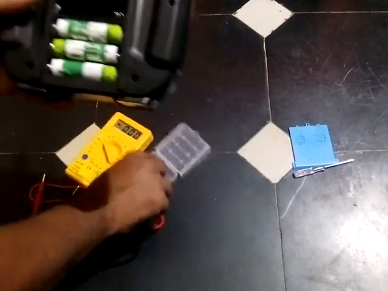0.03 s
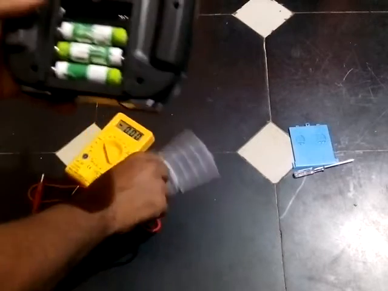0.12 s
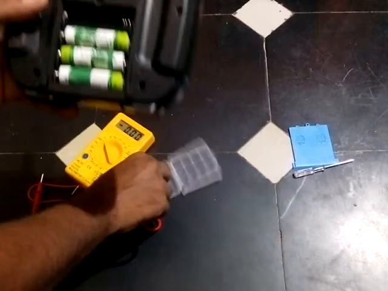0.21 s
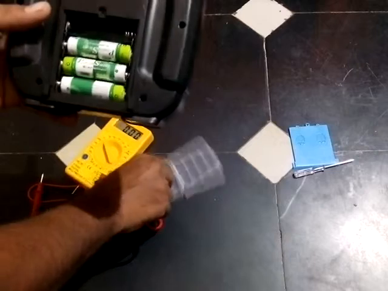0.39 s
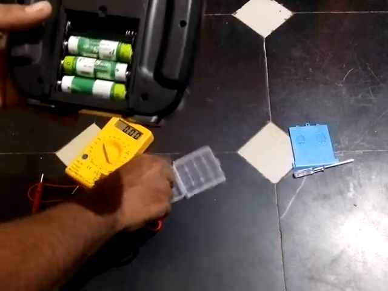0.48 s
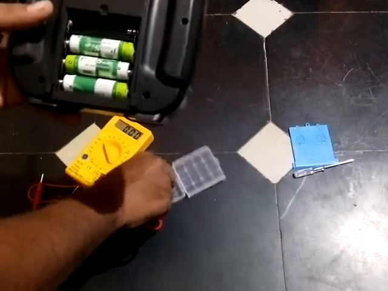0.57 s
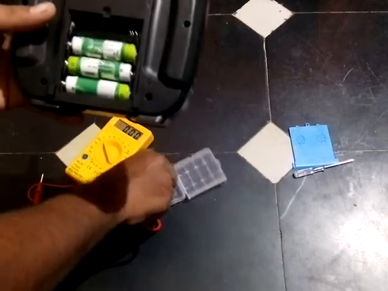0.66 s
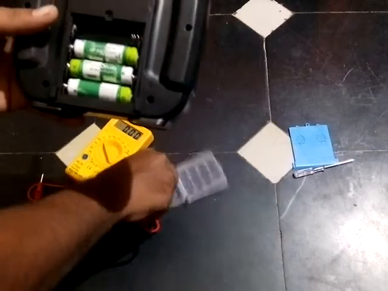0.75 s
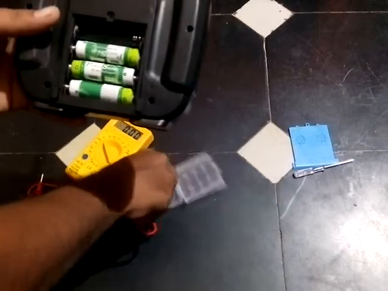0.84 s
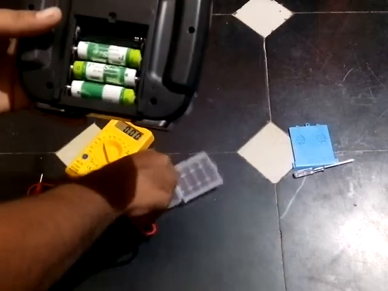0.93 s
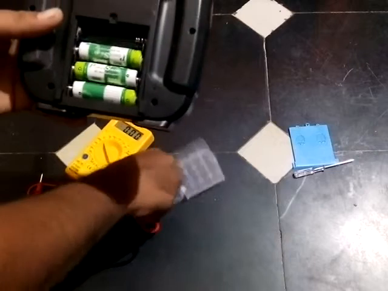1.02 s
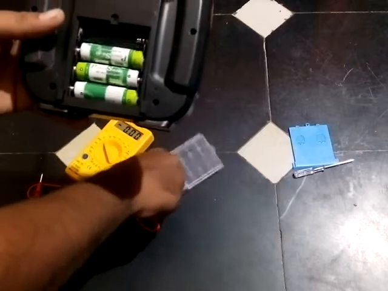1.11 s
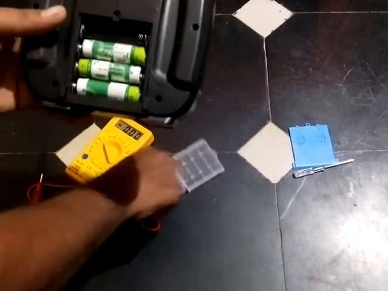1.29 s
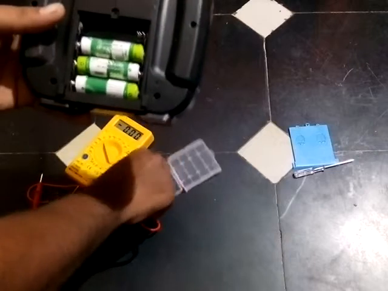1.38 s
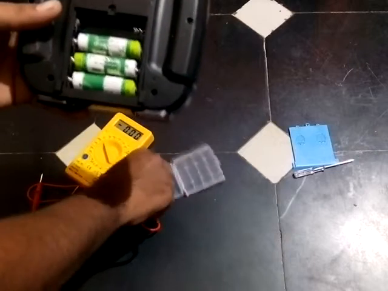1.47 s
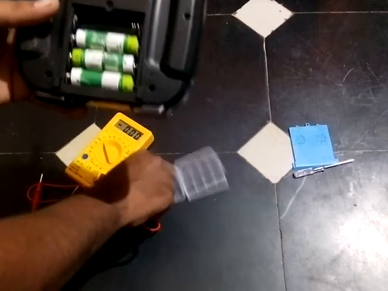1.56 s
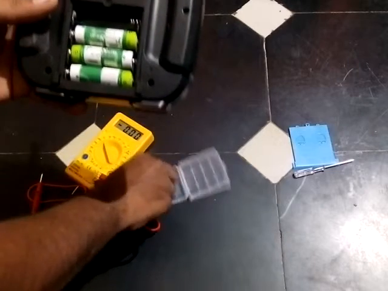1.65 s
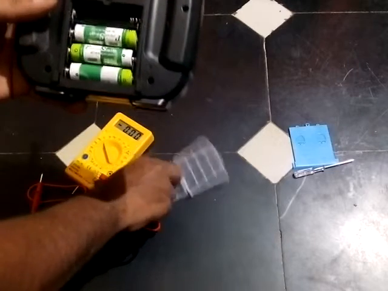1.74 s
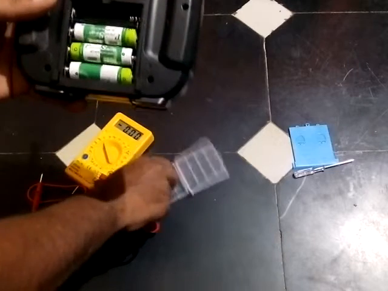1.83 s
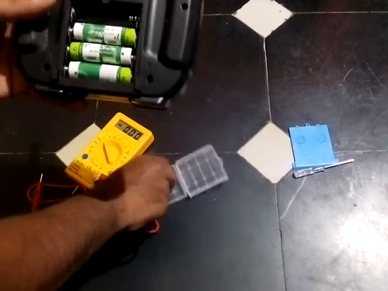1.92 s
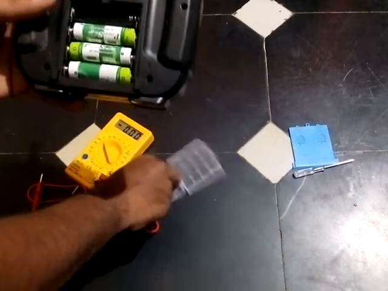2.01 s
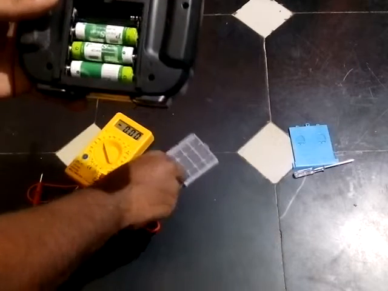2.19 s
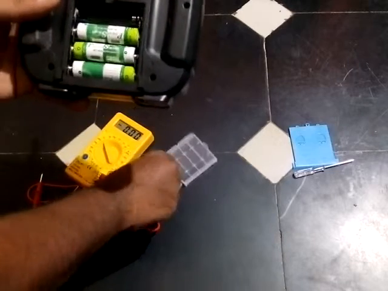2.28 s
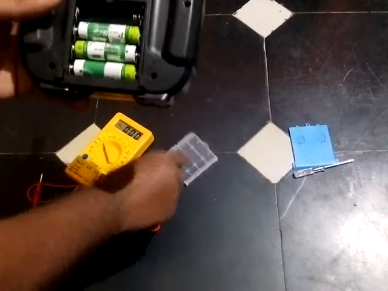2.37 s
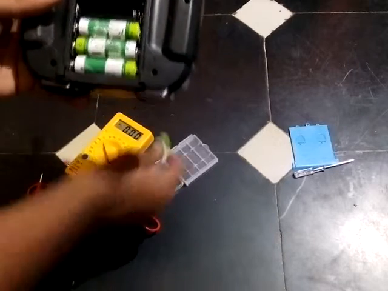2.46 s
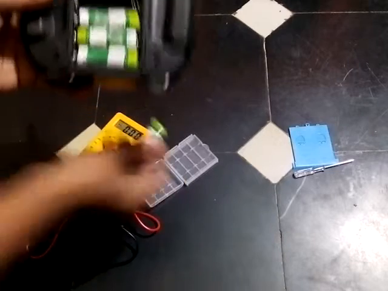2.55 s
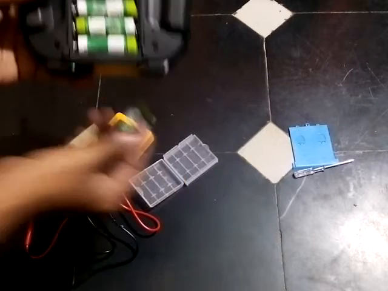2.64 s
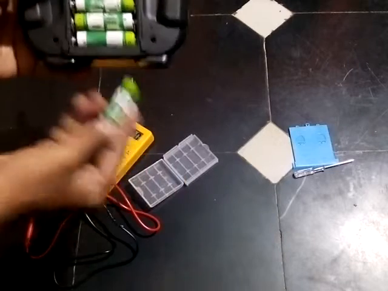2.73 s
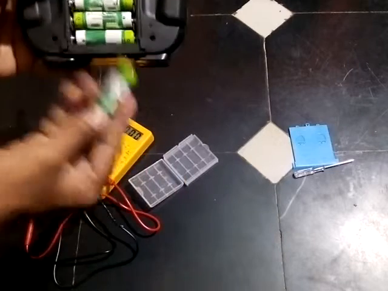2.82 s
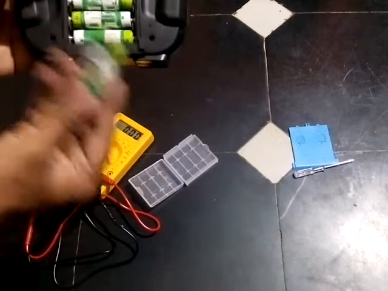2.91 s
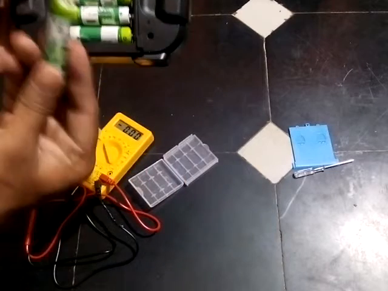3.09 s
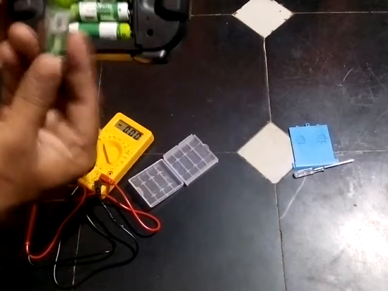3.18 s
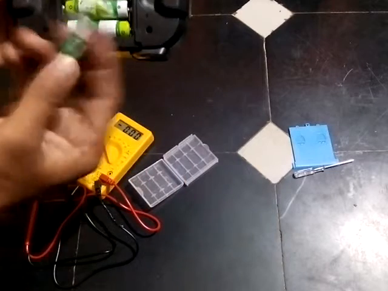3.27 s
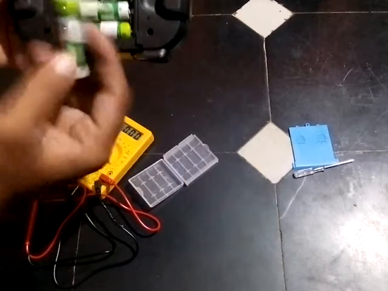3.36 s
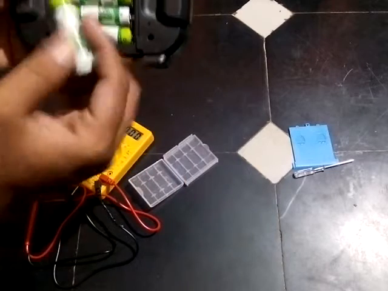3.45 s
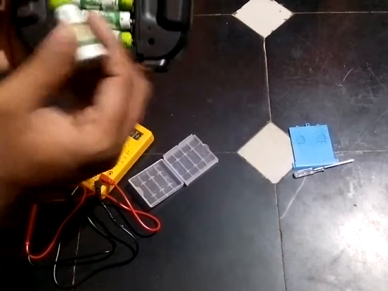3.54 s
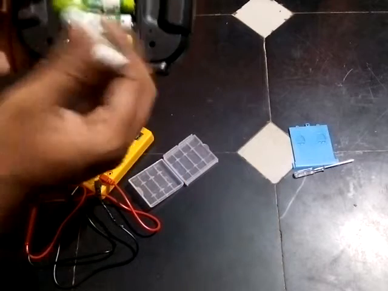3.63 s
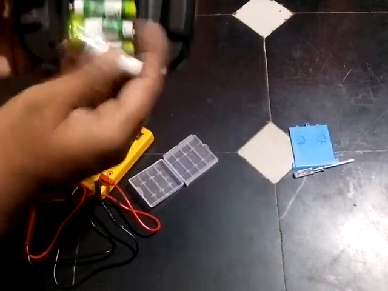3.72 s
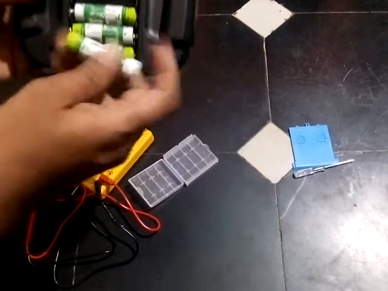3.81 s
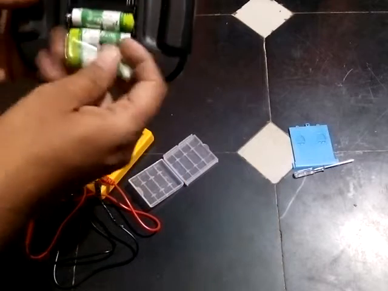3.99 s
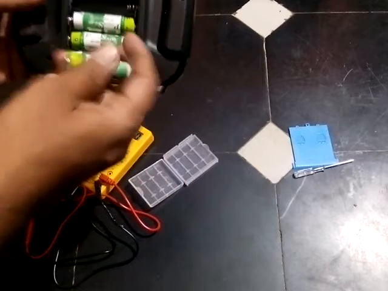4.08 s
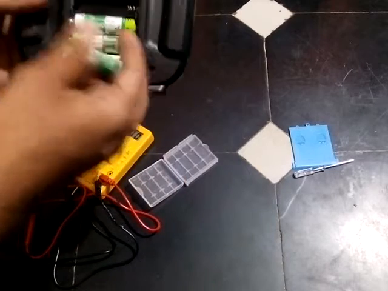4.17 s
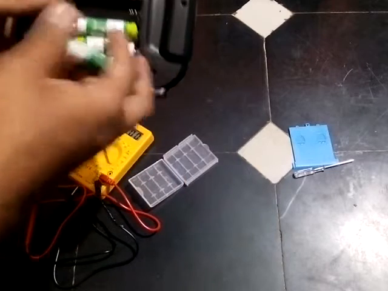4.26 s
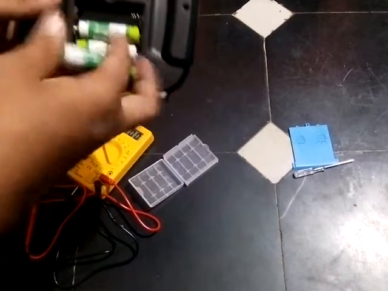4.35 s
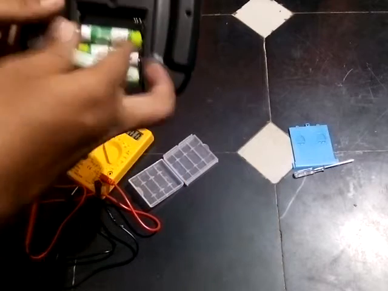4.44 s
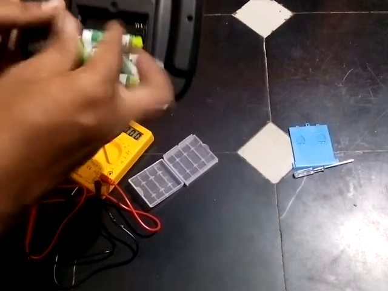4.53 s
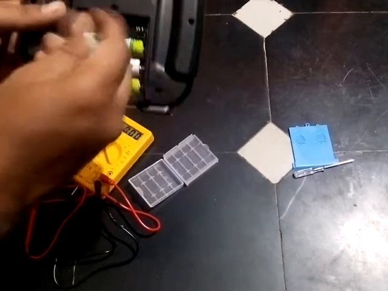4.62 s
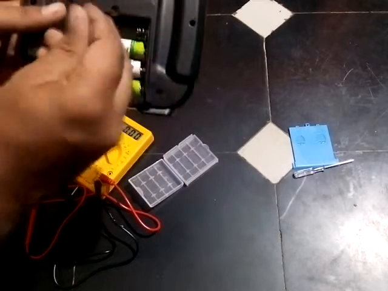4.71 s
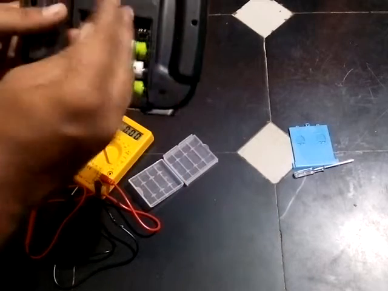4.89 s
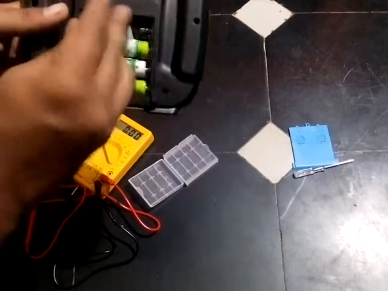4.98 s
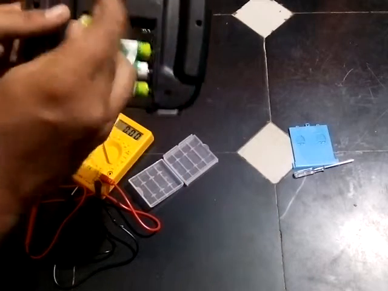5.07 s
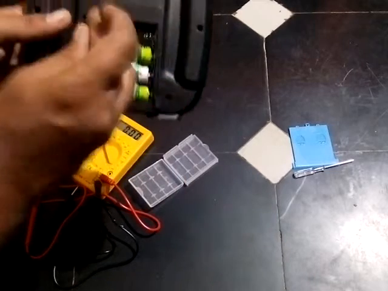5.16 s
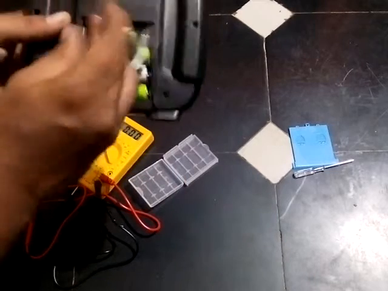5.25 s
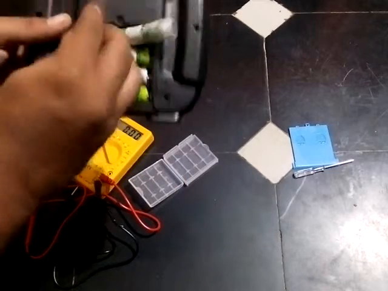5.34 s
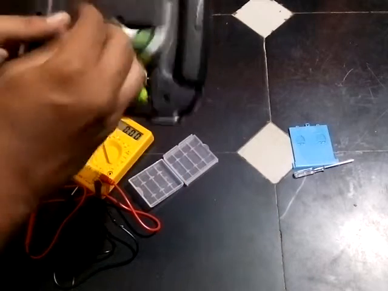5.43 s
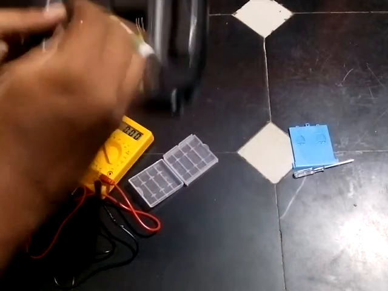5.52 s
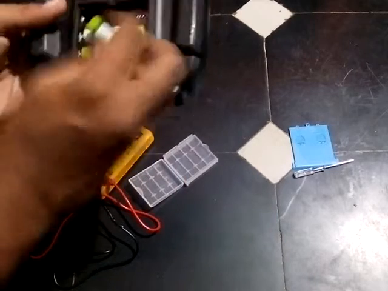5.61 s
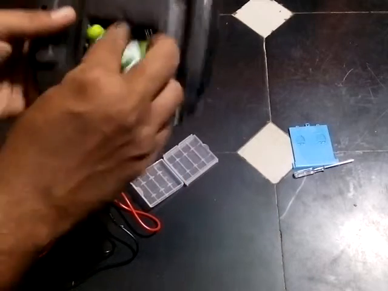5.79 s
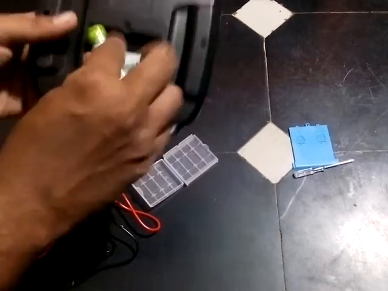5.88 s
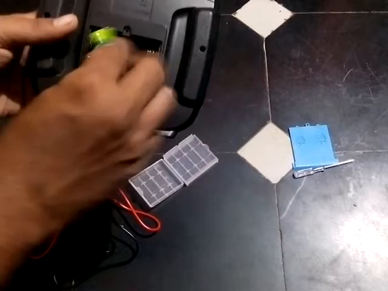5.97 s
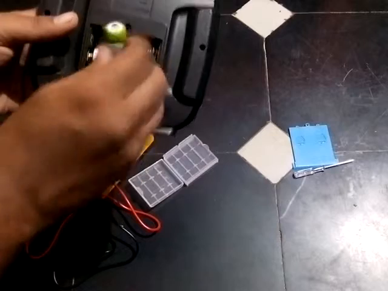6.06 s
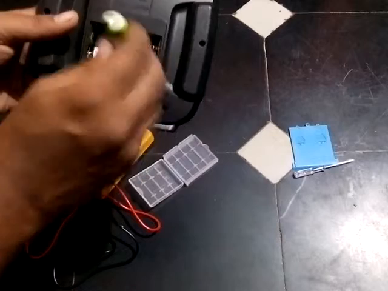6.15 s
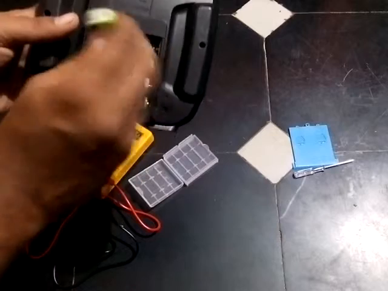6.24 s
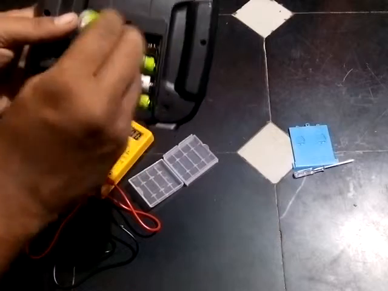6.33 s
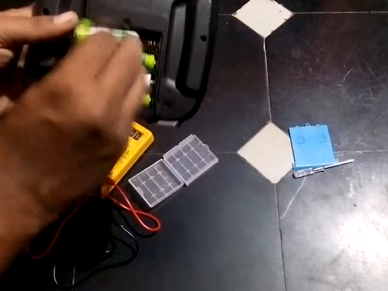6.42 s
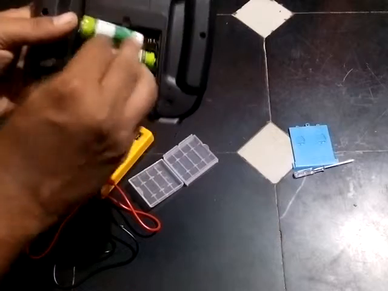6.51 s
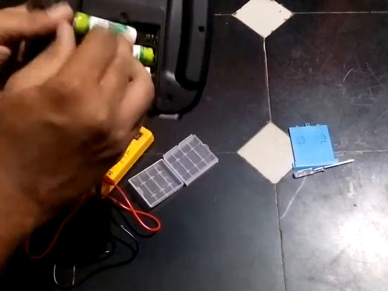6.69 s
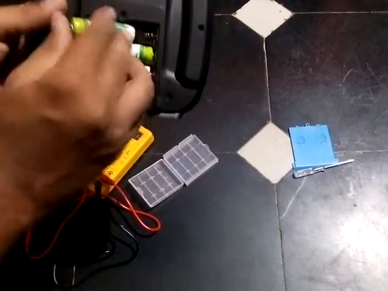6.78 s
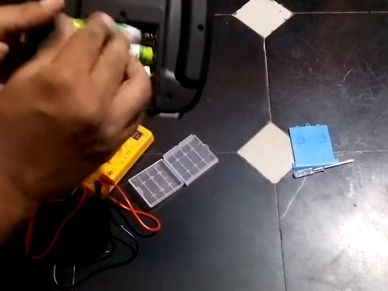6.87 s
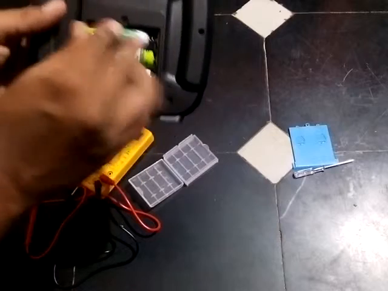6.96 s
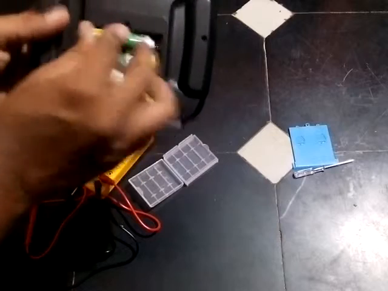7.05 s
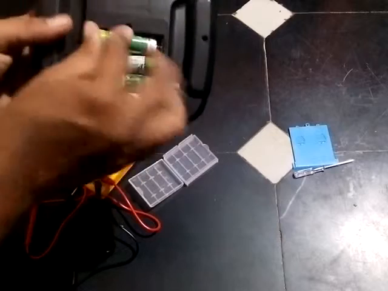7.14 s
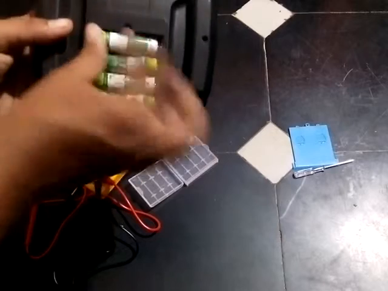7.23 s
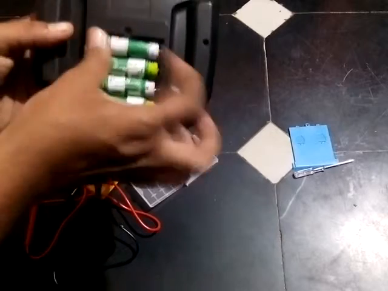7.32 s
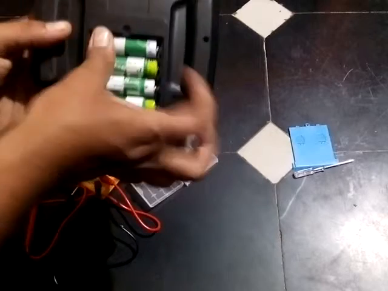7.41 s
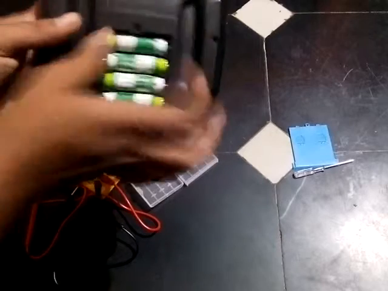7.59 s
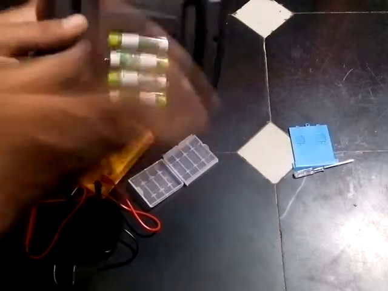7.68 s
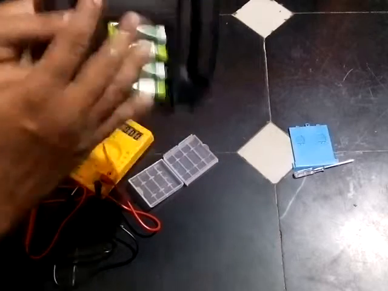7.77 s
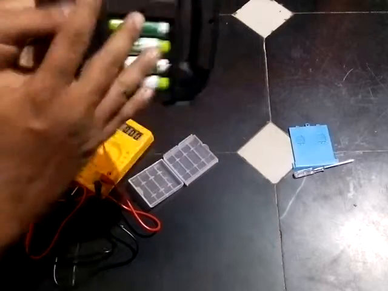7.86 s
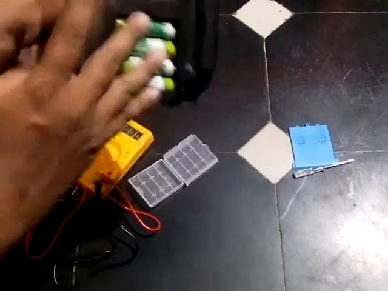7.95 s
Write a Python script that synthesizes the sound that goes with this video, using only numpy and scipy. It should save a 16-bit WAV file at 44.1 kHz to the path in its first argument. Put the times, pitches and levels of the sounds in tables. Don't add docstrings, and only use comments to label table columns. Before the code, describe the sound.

Close plastic clicks and rattles against floor tiles, a pause, then batteries clacking and settling into a boxy controller bay with soft finger rubbing.

```python
import sys
import numpy as np
from scipy import signal
from scipy.fft import rfft, irfft
from scipy.io import wavfile
from scipy.ndimage import uniform_filter1d

SR = 44100
rng = np.random.default_rng(int(sys.argv[2]) if len(sys.argv) > 2 else 0)


def amplitude_ratio(level_db):
    exponent = np.asarray(level_db, float) / 20
    return 10 ** exponent


def transcribe(signal):
    frames = np.atleast_2d(signal).T
    limited = np.clip(frames, -1, 1)
    pcm = np.round(limited * 32767).astype(np.int16)
    wavfile.write(sys.argv[1], SR, pcm)


N = 352800


def level(x, db):
    return x * amplitude_ratio(db) / np.sqrt(np.mean(x ** 2))


def unit(x):
    return x / np.sqrt(np.sum(x ** 2))


def band(x, hz, width_hz):
    return signal.lfilter(*signal.iirpeak(hz, hz / width_hz, fs=SR), x)


def steep(x, hz, width_hz):
    section = np.concatenate(signal.iirpeak(hz, hz / width_hz, fs=SR))
    return signal.sosfilt([section] * 2, x)


def edge(x, hz, kind, order=2):
    return signal.sosfilt(signal.butter(order, hz, kind, fs=SR, output="sos"), x)


def coloured(points):
    hz, db = np.transpose(points)
    f = np.maximum(np.arange(N // 2 + 1) * SR / N, 1)
    colour_db = np.interp(np.log(f), np.log(hz), db, right=-90)
    return irfft(rfft(rng.standard_normal(N)) * amplitude_ratio(colour_db), N)


def walk(rate):
    hold = int(SR / rate)
    steps = np.repeat(rng.standard_normal(N // hold + 1), hold)
    return uniform_filter1d(uniform_filter1d(steps, hold), hold)[:N]


def swells(rows, rise_db_s):
    t = np.arange(N) / SR
    slopes = [db - np.where(t < s, rise_db_s * (s - t), fade_db_s * (t - s)) for s, db, fade_db_s in rows]
    return amplitude_ratio(np.max(slopes, axis=0))


# frequency in Hz, level in dB per Hz
TONE_MID = [(12, -33.5), (20, -2.5), (27, -26), (43, -17), (85, -7), (103, 1), (126, -11), (166, -10.5),
            (287, -16), (359, -17), (702, -24.5), (836, -27.5), (4430, -23.5), (7660, -30), (9960, -64),
            (16900, -120)]
# frequency in Hz, level in dB per Hz
TONE_SIDE = [(12, -31), (20, -1), (22, -13.5), (27, -23), (101, -8.5), (129, -14), (287, -15.5),
             (359, -14.5), (496, -18), (901, -23), (1410, -27.5), (4010, -19), (4320, -16), (7660, -18),
             (9960, -61.5), (16900, -120)]
# frequency in Hz, width in Hz, level in dB
MAINS_HUM = [(67, 21, -76.5), (91.4, 6.25, -63)]
# height in seconds, level in dB, fade in dB per second
HAND_WAFTS = [
    (7.71, -55, 80),
    (7.776, -48, 600),
]


def air():
    mid = level(coloured(TONE_MID), -60.5)
    side = level(coloured(TONE_SIDE), -58.5)
    waft = swells(HAND_WAFTS, rise_db_s=306)
    out = np.array([mid + side, mid - side])
    for port in out:
        for hz, width_hz, db in MAINS_HUM:
            port += level(band(rng.standard_normal(N), hz, width_hz), db)
        gust = edge(edge(rng.standard_normal(N), 79, "low"), 25, "high")
        port += level(gust, 0) * waft
    return out


# frequency in Hz, width in Hz, level in dB
RUB_RINGS = [(1200, 1200, -14), (2300, 1500, -11), (3500, 2000, 0), (5300, 2800, -2)]
# frequency in Hz, width in Hz, level in dB
HELD_SHELL_RINGS = [(374.6, 50, -7.5), (650, 87, 1.5), (1170, 83, 1)]
# height in seconds, level in dB, fade in dB per second
FINGER_STROKES = [(0.0, -48.5, 24.5), (0.35, -52, 19), (1.51, -45, 62.5), (1.9, -54, 123),
                  (2.35, -53.5, 71), (5.492, -64.5, 138), (5.582, -56, 69), (6.95, -64, 77),
                  (7.192, -54.5, 197), (7.496, -52, 101), (8.0, -49.5, 100)]


def scuff():
    slips = rng.standard_normal((2, N))
    slips *= amplitude_ratio(1.4 * rng.exponential(size=(2, N)))
    slips *= amplitude_ratio(5.3 * walk(45))
    rub = sum(amplitude_ratio(db) * steep(slips, hz, width_hz) for hz, width_hz, db in RUB_RINGS)
    shell = sum(amplitude_ratio(db) * steep(slips[0], hz, width_hz) for hz, width_hz, db in HELD_SHELL_RINGS)
    in_hand = np.arange(N) > 5 * SR
    both = level(rub, -1.0) + level(shell, -10.5) * in_hand
    return both * swells(FINGER_STROKES, rise_db_s=70.5) * amplitude_ratio([[2.5], [-2.5]])


def knocks(hits, modes, chatter_ms, low_own_db, low_t60, bass_hz, crack_db, crack_hz):
    length = 3000
    out, t = np.zeros(N + length), np.arange(length) / SR
    hz, db, t60 = np.transpose(modes)
    group = np.append(np.searchsorted((1500, 4500), hz), [0, 1])
    decay = np.append(t60, [low_t60, .009])[:, None]
    fade = np.exp(-np.log(1000) * t / decay)
    for s, peak_db, low_hz, high_hz, low_db, high_db in hits:
        chance = rng.standard_normal((2, len(hz)))
        f = np.append(hz * (1 + .03 * chance[0]), [low_hz, high_hz])
        gain = amplitude_ratio(np.append(db + 2.5 * chance[1], [low_own_db, 13]))
        gain[:-2:2] *= -1
        soft = min(amplitude_ratio(low_db), 1) ** 2
        touch_ms = chatter_ms * (1 + 1.5 * amplitude_ratio(peak_db) + 3 * soft)
        touch = rng.standard_normal(length) ** 3 * np.exp(-t * 1000 / touch_ms)
        touch[0] = 3 * (1 - soft)
        push = np.sqrt(uniform_filter1d(np.abs(rfft(touch)) ** 2, size=15))
        gain /= push[(f * length / SR).astype(int)]
        rings = gain[:, None] * np.sin(2 * np.pi * f[:, None] * t) * fade
        low, mid, high = (signal.fftconvolve(rings[group == g].sum(0), touch)[:length] for g in range(3))
        low = edge(low, bass_hz, "high")
        mid = edge(mid, 1.072 * min(crack_hz, high_hz), "high", order=4)
        high = edge(high, 2800, "high", order=4)
        rest = np.sqrt(max(1 - amplitude_ratio(low_db) ** 2 - amplitude_ratio(high_db) ** 2, .05))
        hit = amplitude_ratio(low_db) * unit(low) + rest * unit(mid) + amplitude_ratio(high_db) * unit(high)
        burst = rng.standard_normal(300) * np.exp(-t[:300] / .0012)
        crack = signal.fftconvolve(burst, touch)[:length]
        top_hz = 3900 + 2400 * min(amplitude_ratio(high_db + 7.5), 1)
        bright = edge(edge(crack, crack_hz, "high", order=3), top_hz, "low", order=3)
        dull = edge(edge(crack, 450, "high"), 1300, "low", order=3)
        hit += amplitude_ratio(crack_db) * rest * unit(bright)
        hit += amplitude_ratio(crack_db + low_db) * unit(dull)
        i = int(s * SR)
        out[i:i + length] += hit * amplitude_ratio(peak_db) / np.abs(hit).max()
    return out[:N]


# frequency in Hz, level in dB, t60 in seconds
CASE_BODY = [(130, -16, .04), (280, -10, .02), (500, -6, .012), (850, -4, .012), (1250, 0, .01),
             (1950, -14, .008), (2400, -11, .008), (2750, -5, .01), (3050, 0, .01), (3400, -2, .01),
             (3750, -1, .01), (4150, -1, .01), (4600, 0, .01), (5000, -1, .008), (5350, -2, .008),
             (5900, -3, .008), (6300, -4, .008), (6700, -7, .005)]
# start in seconds, peak in dB, leading ring in Hz, high rings in dB
TILE_BLOWS = [(1.322, -17.5, 3000, -27.5), (1.396, -17.5, 4940, -7.5), (1.417, 1, 3100, -8.5),
              (1.484, -7, 3192, -0.5), (1.863, -22, 3285, -4), (1.867, -13, 3300, -7),
              (2.019, -9, 2935, -42), (2.069, -41, 3130, -20), (2.105, -14.5, 3200, -1),
              (2.115, -28, 3200, -7), (2.495, -29, 3330, -36)]
# start in seconds, peak in dB, leading ring in Hz, high rings in dB
CELL_RATTLES = [(0.7546, -12, 3260, -4.5), (1.378, -11.5, 4404, -3), (1.434, -7.5, 5083, 3),
                (1.444, -15.5, 3238, -40), (1.462, -8, 3940, 13.5), (1.502, -13, 3880, -17),
                (1.64, -30, 3884, -3), (1.87, -13, 3510, -5.5), (2.171, -28.5, 3030, -3),
                (2.564, -19.5, 3600, -8.5), (2.641, -27.5, 3120, -33)]
# start in seconds, peak in dB, low rings in dB
FINGER_TICKS = [(0.014, -36, -9), (0.079, -44, -27), (0.242, -42.5, -3.5), (0.554, -34, -29),
                (0.571, -45, -45), (0.593, -37.5, -5.5), (0.939, -46.5, -14), (1.115, -45, -38),
                (1.579, -34, -18.5), (2.188, -47, -41), (2.284, -38, -18), (2.315, -42, -19),
                (2.326, -33, -23), (2.436, -38, -17.5), (2.457, -44, -27), (2.539, -34.5, -15.5),
                (2.607, -45, -32), (2.723, -49, -16)]
# start in seconds, peak in dB, leading ring in Hz
LIGHT_TOUCHES = [
    (0.747, -34.5, 3250),
    (1.308, -38.5, 3800),
    (2.099, -32.5, 3140),
    (5.592, -15.5, 4300),
]
# start in seconds, peak in dB, leading ring in Hz
TILE_DRAGS = [
    (.122, -35, 3180),
    (0.648, -40, 3300),
    (1.79, -40.5, 5060),
    (2.555, -28.5, 3300),
]


def thin_case():
    low_hz = 1076.6
    hits = [(s, db, low_hz, hz, -25, high_db) for s, db, hz, high_db in TILE_BLOWS]
    hits += [(s, db, low_hz, hz, -42, high_db) for s, db, hz, high_db in CELL_RATTLES]
    hits += [(s, db, low_hz, 3300, low_db, -19.5) for s, db, low_db in FINGER_TICKS]
    hits += [(s, db, low_hz, hz, -34, -7.5) for s, db, hz in LIGHT_TOUCHES]
    drags = [(s, db, low_hz, hz, -27, -1.5) for s, db, hz in TILE_DRAGS]
    struck = knocks(hits, CASE_BODY, chatter_ms=0.65, low_own_db=-2.5, low_t60=0.0047,
                    bass_hz=91.6, crack_db=-2.5, crack_hz=2722)
    dragged = knocks(drags, CASE_BODY, chatter_ms=15, low_own_db=4, low_t60=.01,
                     bass_hz=292, crack_db=-4, crack_hz=2405)
    return struck + dragged


# frequency in Hz, level in dB, t60 in seconds
BAY_BODY = [(90, -20, .05), (170, -16, .04), (300, -12, .035), (370, -6, .035), (450, -7, .03),
            (540, -5, .025), (610, -1, .025), (690, 0, .025), (900, -9, .015), (1090, -3, .02),
            (1200, -1, .02), (1600, -10, .012), (2020, -3, .014), (2360, -5, .012), (2900, 0, .012),
            (3200, -1, .012), (3500, -2, .012), (3850, -2, .012), (4250, -3, .012), (4700, 0, .01),
            (5250, -2, .01), (5700, -3, .01), (6200, -5, .01), (6600, -8, .005)]
# start in seconds, peak in dB, leading low ring in Hz,
# leading high ring in Hz, high rings in dB
CELL_SNAPS = [(5.316, -17, 723, 2210, -15), (5.369, 2.5, 1086, 3045, -11.5),
              (5.373, -14.5, 1253, 2862, -16), (5.389, -13, 1090, 3480, -18),
              (5.549, -10.5, 1090, 3088, -28.5), (5.601, -12.5, 657, 1883, -16),
              (5.664, -19, 412, 2020, -3), (5.715, -15, 1180, 3010, -12), (5.88, -17, 723, 3336, -5),
              (6.282, -27.5, 1210, 1960, -37.5), (6.68, -3.5, 1050, 4482, -2),
              (7.032, -28, 1210, 2000, -22.5), (7.614, -8.5, 345, 4320, -5.5),
              (7.649, -30.5, 347, 5085, -12)]
# start in seconds, peak in dB, leading low ring in Hz, high rings in dB
CELL_SETTLES = [(5.412, -17, 1150, -24), (5.693, -21, 680, -43), (5.729, -24, 654, -42),
                (6.696, -19.5, 1210, -24.5), (6.719, -19.5, 614, -29), (6.738, -18.5, 482, -15),
                (6.768, -17, 650, -15), (6.775, -22.5, 1160, -9), (7.011, -29.5, 650, -22),
                (7.116, -44.5, 605, -32), (7.292, -27.5, 1140, -22), (7.339, -32.5, 1220, -39),
                (7.498, -41.5, 1220, -20), (7.831, -48.5, 317, -16)]
# start in seconds, peak in dB, leading ring in Hz, low rings in dB
NAIL_TICKS = [
    (3.729, -44, 1676, -5.5),
    (4.519, -45, 2080, -24.5),
    (6.147, -35.5, 5040, -20),
    (7.32, -31, 3300, -13.5),
    (7.543, -32.5, 4860, -18),
    (7.994, -43.5, 3130, -18),
]
# start in seconds, peak in dB, leading ring in Hz
CELL_DRAGS = [
    (5.533, -33.5, 3040),
    (5.938, -20.5, 3300),
    (7.219, -33, 3000),
    (7.23, -30, 4900),
    (7.463, -44.5, 3300),
    (7.583, -40, 4030),
]


def hollow_bay():
    hits = [(s, db, low_hz, hz, -4.5 - 8 * amplitude_ratio(db), high_db) for s, db, low_hz, hz, high_db in CELL_SNAPS]
    hits += [(s, db, low_hz, 3130, -0.5 - 21 * amplitude_ratio(db), high_db) for s, db, low_hz, high_db in CELL_SETTLES]
    hits += [(s, db, 1220, hz, low_db, -12.5) for s, db, hz, low_db in NAIL_TICKS]
    drags = [(s, db, 656, hz, -4, -7.5) for s, db, hz in CELL_DRAGS]
    struck = knocks(hits, BAY_BODY, chatter_ms=1.37, low_own_db=4, low_t60=0.04,
                    bass_hz=94.5, crack_db=-2.5, crack_hz=1640)
    dragged = knocks(drags, BAY_BODY, chatter_ms=1.6, low_own_db=7, low_t60=0.035,
                     bass_hz=202, crack_db=-5.5, crack_hz=1700)
    return struck + dragged


# delay in ms, level in dB
FIRST_ECHOES = [(5.5, -19), (12, -21), (15, -19), (18, -15), (31, -22)]


def room(x, echo_db, spread_s):
    t = np.arange(SR // 10) / SR
    out = []
    for _ in range(2):
        echoes = 0
        for ms, db in FIRST_ECHOES:
            lag = np.maximum(t - ms / 1000, 0)
            smear = rng.standard_normal(len(t)) * np.exp(-lag / spread_s) * (lag > 0)
            echoes = echoes + amplitude_ratio(db + echo_db) * unit(smear)
        out.append(signal.fftconvolve(x, echoes)[:N])
    return np.array(out)


def hold(x, keep):
    return signal.lfilter([1 - keep], [1, -keep], x)


# frequency in Hz, t60 in seconds, level in dB
ROOM_DECAY = [(234.5, 0.4, -8.5), (600, .25, -10), (1512, 0.17, -12), (3000, .32, -14.5),
              (4940, 0.23, -14.5)]


def tail(x):
    build_s, hop = 0.0022, 16
    places, t60s, dbs = np.transpose(ROOM_DECAY)
    out, noise = 0, rng.standard_normal((2, N))
    for hz in 180 * 2 ** (np.arange(16) / 3):
        t60, db = (np.interp(np.log(hz), np.log(places), v) for v in (t60s, dbs))
        power = np.mean(steep(x, hz, .27 * hz).reshape(-1, hop) ** 2, axis=1)
        fed = hold(power, np.exp(-hop / (build_s * SR)))
        stored = hold(fed, 1e6 ** (-hop / (t60 * SR)))
        shifted = np.roll(noise, int(9 * hz), axis=1)
        out = out + level(steep(shifted, hz, .3 * hz), db + 4) * np.repeat(np.sqrt(stored), hop)
    return edge(out, 6600, "low", order=4)


def suppress(wet, floor_db, frame_s):
    power = uniform_filter1d(np.mean(wet ** 2, axis=0), int(frame_s * SR))
    return wet * power / (power + amplitude_ratio(floor_db) ** 2)


def ports(x):
    dull = edge(x, 2900, "low", order=1)
    bright = np.roll(x - edge(x, 1300, "low", order=1), 41)
    left = amplitude_ratio(2.5) * dull + amplitude_ratio(1.5) * bright
    right = amplitude_ratio(1.0) * x + amplitude_ratio(-10.5) * edge(x, 3600, "low", order=1)
    return np.array([left, right])


def scene():
    tiles, held, rub = (edge(v, 6400, "low", order=6) for v in (thin_case(), hollow_bay(), scuff()))
    on_floor = tiles + rub[1]
    echoes = room(on_floor, echo_db=-4.5, spread_s=0.00035) + room(held, echo_db=-11, spread_s=0.0019)
    mid, side = echoes + tail(on_floor + held)
    side = amplitude_ratio(-6.5) * side + amplitude_ratio(0.5) * edge(side, 3600, "high")
    wet = np.array([amplitude_ratio(7.5) * (mid + side), amplitude_ratio(2.5) * (mid - side)])
    return ports(tiles + held) + rub + suppress(wet, floor_db=-63.0, frame_s=0.022) + air()


def low_pass(x):
    return signal.sosfilt(signal.butter(12, 8600, fs=SR, output="sos"), x)


def record(dry):
    cut = edge(edge(dry, 7000, "low", order=4), 7900, "low", order=8)
    offset = np.array([[-.00195], [-.00015]])
    return low_pass(np.clip(amplitude_ratio(0.3) * cut + offset, -1, 1))


dry = scene()
out = record(dry)
transcribe(out)
```